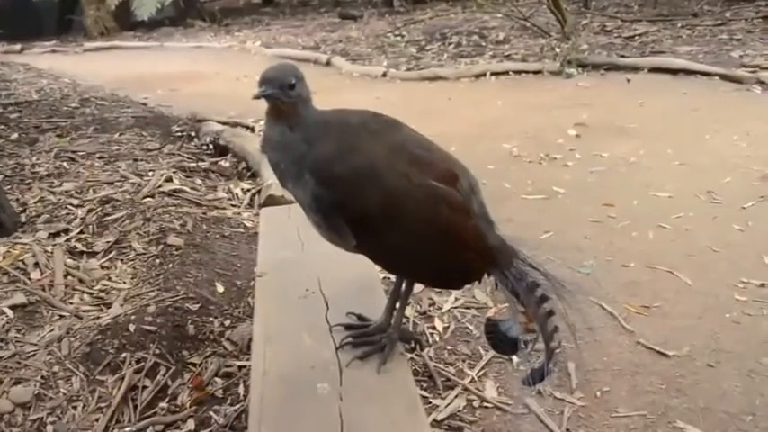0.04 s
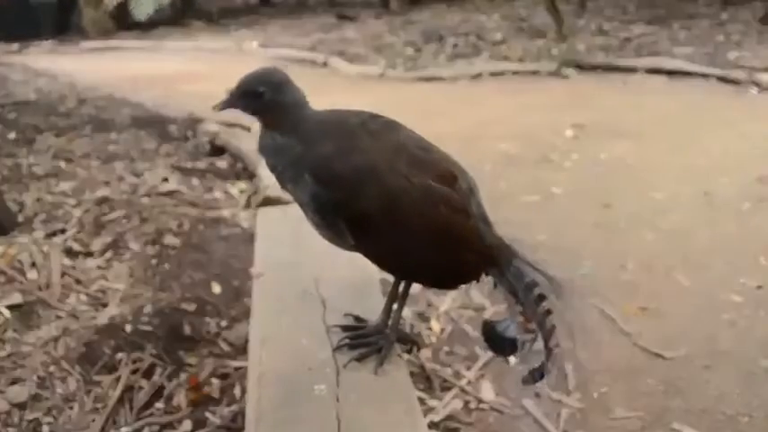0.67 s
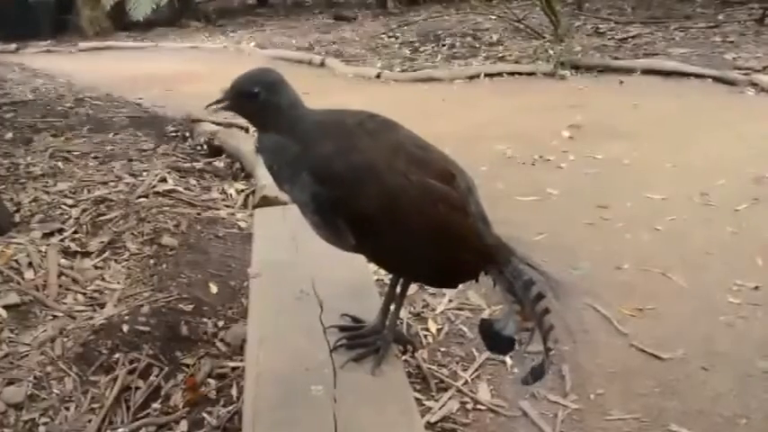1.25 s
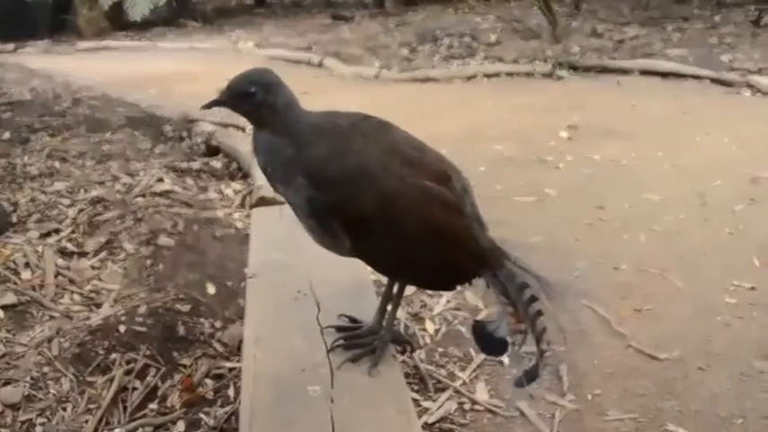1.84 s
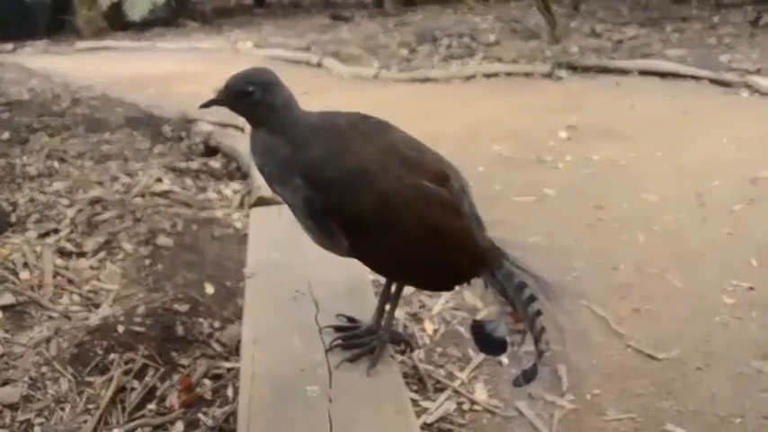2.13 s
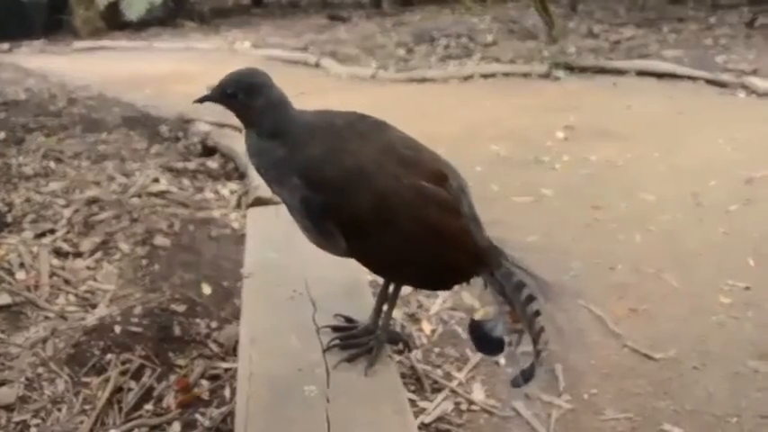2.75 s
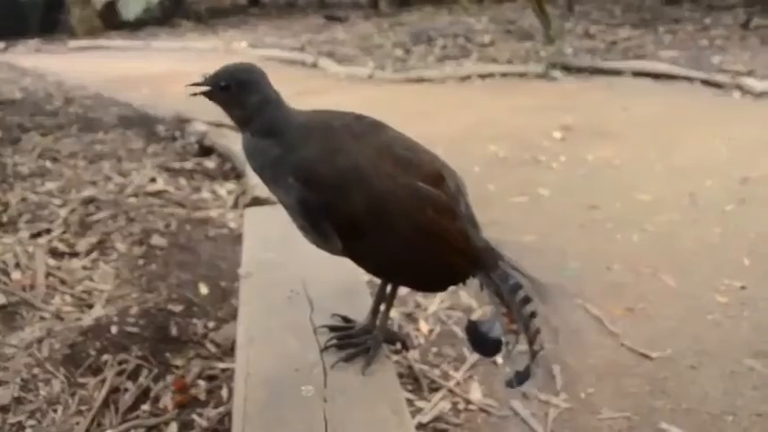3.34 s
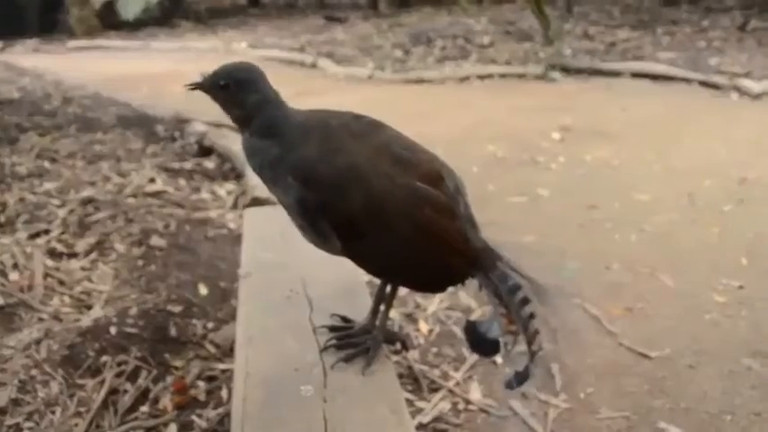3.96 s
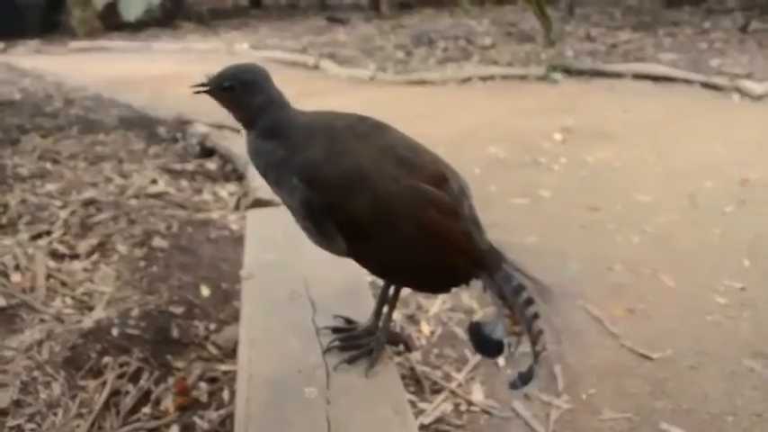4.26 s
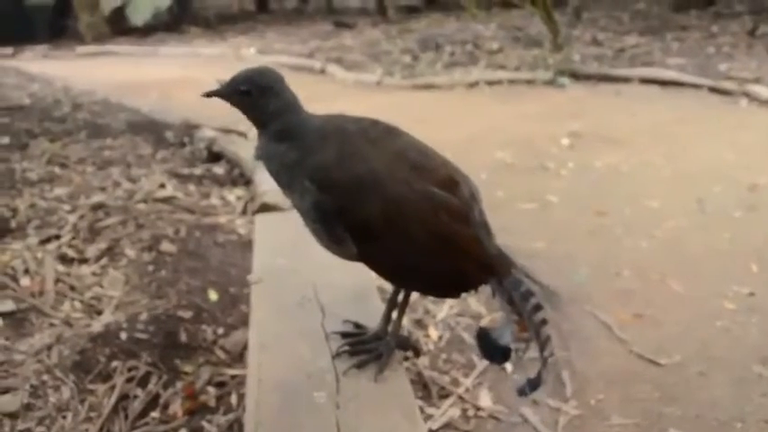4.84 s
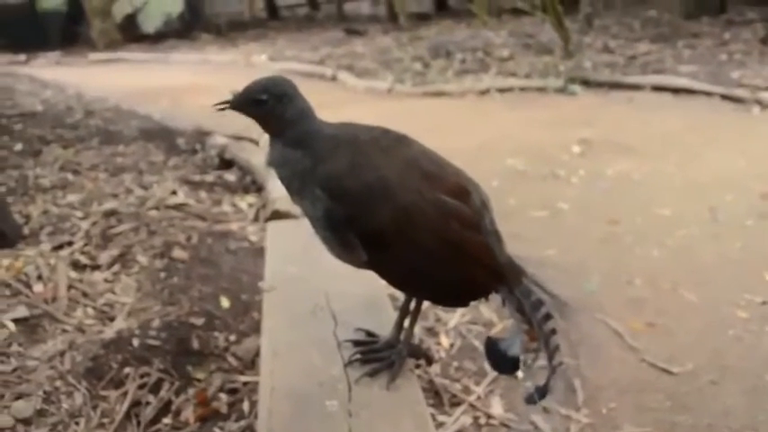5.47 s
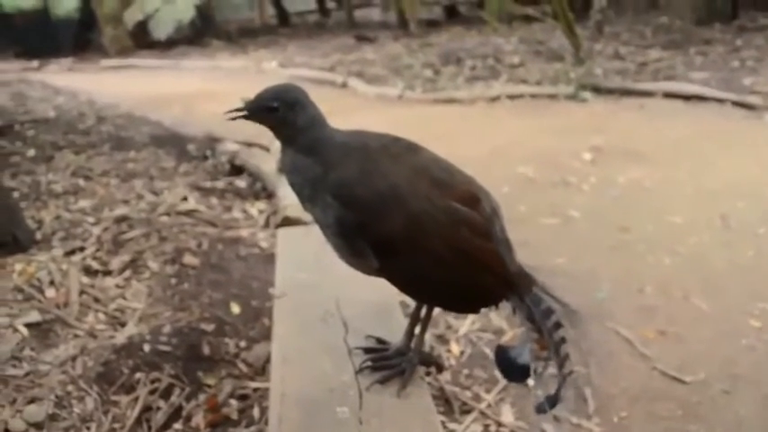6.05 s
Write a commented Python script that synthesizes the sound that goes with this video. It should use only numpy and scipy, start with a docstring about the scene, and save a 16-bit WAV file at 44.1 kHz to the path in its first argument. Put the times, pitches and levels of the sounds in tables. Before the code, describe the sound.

A lyrebird about a metre from the microphone makes sharp, shutter-like clicks and short rasps, then a loud falling whistle and a rising one. More clicks lead into four short, hoarse wails, followed by clicks mixed with rough growls, a quick hoot and a yelp. Other birds call far off over the soft hush of a wooded enclosure with a faint echo.

```python
"""A lyrebird's imitations

A lyrebird on the ground of a wooded enclosure, about a metre away, gives shutter-like clicks and rasps,
a falling and a rising whistle, four hoarse wails, then growls, a hoot and a yelp. Its syrinx is the
source, of tones or of pulses; throat, chest and beak are the resonators that filter it.
Other birds call far off over a soft outdoor hush, and the surroundings give a faint echo."""
import sys
import numpy as np
from scipy import signal
from scipy.fft import rfft, irfft
from scipy.io import wavfile
from scipy.ndimage import uniform_filter1d

SR = 44100
rng = np.random.default_rng(int(sys.argv[2]) if len(sys.argv) > 2 else 0)


def store_pcm(level_fs):
    """Save levels as 16-bit WAV."""
    pcm = np.round(np.clip(level_fs, -1, 1) * 32767).astype(np.int16)
    wavfile.write(sys.argv[1], SR, np.atleast_2d(pcm).T)


N = 268921
BAND_LIMIT_HZ = 15750


def amp(db):
    """Amplitude ratio of a level in decibels."""
    return 10 ** (np.asarray(db) / 20)


def unit_rms(x):
    """Normalisation to rms 1."""
    return x / np.sqrt(np.mean(x ** 2) + 1e-20)


def steadied(x):
    """Division by the running rms flattens the envelope and keeps the grain."""
    return x / np.sqrt(abs(uniform_filter1d(x ** 2, 500)) + 1e-12)


def level_at(spectrum, hz):
    """Level of a spectrum, interpolated over log frequency."""
    f, db = np.transpose(spectrum)
    return np.interp(np.log(hz + 1), np.log(f + 1), db)


def contours(rows):
    """Sample times of a call, then each column interpolated linearly."""
    times, *columns = np.transpose(rows)
    t = np.arange(times[0], times[-1], 1 / SR)
    return [t] + [np.interp(t, times, column) for column in columns]


def progress(length):
    """Normalised time, 0 to 1 over a note."""
    return np.linspace(0, 1, int(length * SR))


def phase_of(hz):
    """Phase is the time integral of frequency."""
    return 2 * np.pi * np.cumsum(hz) / SR


def add(mix, start, sound):
    """Superposition of a sound on the mix from its start time."""
    part = mix[max(round(start * SR), 0):][:len(sound)]
    part += sound[:len(part)]


def faded(x):
    """A cosine taper softens both ends of a call."""
    return x * signal.windows.tukey(len(x), min(1, 200 / len(x)))


def gate(size, edge_s):
    """Trapezoidal envelope: attack, hold and release."""
    t = np.arange(size) / SR
    return np.minimum(np.minimum(t, t[::-1]) / edge_s, 1)


def wander(size, hz):
    """Random modulation: noise of rms about 1, low-passed near hz."""
    f = np.fft.rfftfreq(size + 4096, 1 / SR)
    spectrum = rfft(rng.standard_normal(2 * len(f) - 2))
    return unit_rms(irfft(spectrum * np.exp(-(f / hz) ** 2)))[:size]


def colour(x, spectrum, tilt_db=0):
    """Minimum-phase filter with the given spectrum, tilted by tilt_db an octave."""
    hz = np.fft.rfftfreq(2048, 1 / SR)
    octaves = np.log2(np.clip(hz, 500, 7000) / 2000)
    log_gain = np.log(amp(level_at(spectrum, hz) + tilt_db * octaves))
    log_response = signal.hilbert(np.r_[log_gain, log_gain[-2:0:-1]]).conj()
    taps = np.fft.ifft(np.exp(log_response)).real
    return signal.fftconvolve(x, taps[:len(hz)])[:len(x)]


def cut(x, order, hz, kind):
    """Maximally flat low-pass or high-pass filter."""
    return signal.sosfilt(signal.butter(order, hz, kind, fs=SR, output="sos"), x)


def resonate(x, hz, *widths_hz):
    """Resonators in cascade, one per bandwidth, with unit gain at a centre hz that may slide."""
    carrier = np.exp(1j * phase_of(hz * np.ones(len(x))))
    for width in widths_hz:
        pole = np.exp(-np.pi * width / SR)
        x = 2 * (carrier * signal.lfilter([1 - pole], [1, -pole], x / carrier)).real
    return x


def pulses(size, rate_hz, jitter, air):
    """Pulse-train source: uneven slaps of the syrinx membranes, with some rushing air."""
    cycles = np.cumsum(rate_hz * np.exp(jitter * wander(size, rate_hz))) / SR
    slaps = np.diff(np.floor(cycles), prepend=0) * np.exp(jitter * rng.standard_normal(size) / 2)
    return unit_rms(slaps - slaps.mean()) + air * rng.standard_normal(size)


def dip_gain(hz):
    """Frequency-dependent gain: a gliding tone dips briefly as it passes certain pitches."""
    # f/Hz, width/Hz, depth/dB
    dips = [(1600, 75, 13), (2550, 30, 17), (2940, 65, 8), (3405, 84, 12), (4360, 84, 15)]
    return amp(-sum(depth / (1 + ((hz - centre) / width) ** 2) ** 2 for centre, width, depth in dips))


def hush(air_db=-48.5, swell_db=1.5):
    """Filtered noise: steady outdoor air, and a soft rustle that comes and goes."""
    # spectra of the air and the rustle: f/Hz, relative level/dB
    air_spectrum = [(15, -55), (25, -11.5), (113, 0), (482, -6), (782, -2), (997, -5.5), (1300, -3),
                    (1710, -4.5), (2120, -1), (4380, -10.5), (5730, -13.5), (6210, -15), (8810, -8.5),
                    (10900, -14.5), (15500, -58)]
    rustle_spectrum = [(300, -5.5), (800, 3), (2200, -6), (4500, -7.5), (7000, -12), (12000, -25),
                       (15000, -64)]
    # envelope of the rustle: t/s, level/dB
    rustle_levels = [(0, -76), (.3, -50), (.5, -47.5), (.9, -46.5), (1.5, -46), (1.9, -52.5), (2.2, -73),
                     (4.4, -50.5), (5.4, -57), (5.62, -47), (6.1, -65)]
    rustle_db = np.interp(np.arange(N) / SR, *np.transpose(rustle_levels))
    air_gain = amp(air_db + swell_db * wander(N, 2.9))
    air = unit_rms(colour(rng.standard_normal(N), air_spectrum))
    rustle = unit_rms(colour(rng.standard_normal(N), rustle_spectrum))
    return air_gain * air + amp(rustle_db) * rustle


def far_ring(hz=840, width_hz=110, db=-57, swell_db=3):
    """Narrow-band noise is heard as a faint ring in the distance."""
    ring = resonate(rng.standard_normal(N), hz, width_hz, width_hz)
    return amp(db + swell_db * wander(N, 3)) * unit_rms(ring)


def far_cries(mix, waver=0.008, fading=0.3):
    """Fading: a far bird's three harmonics swell and sink on their way through the trees."""
    # t/s, length/s, start f/Hz, end f/Hz, level/dB of harmonics 1, 2 and 3
    calls = [(0, 0.29, 630, 702, -73, -57.5, -54.5), (.26, 0.32, 801, 817.4, -58, -53.5, -50),
             (.56, 0.18, 692, 668, -47, -61, -58), (2.05, 0.34, 802, 841, -52.5, -77, -86),
             (2.85, 0.12, 829, 820, -46, -75, -55.5), (4.44, 0.21, 794, 816.5, -50.5, -57, -38),
             (4.66, 0.3, 785, 783, -59, -61, -42), (4.95, 0.21, 764, 776, -51, -69, -54)]
    for start, length, start_hz, end_hz, *levels in calls:
        size = int(length * SR)
        phase = phase_of(np.linspace(start_hz, end_hz, size) * (1 + waver * wander(size, 120)))
        tone = sum(np.sqrt(2) * amp(db) * (1 + fading * wander(size, 52)) * np.sin(k * phase)
                   for k, db in enumerate(levels, 1))
        add(mix, start, tone * signal.windows.tukey(size, 0.4))


def clicks(mix, echo_s=0.0008, flutter_s=0.0046, hard_until_s=0.79, saturation=1.06, size=1500):
    """Impulse excitation: a sharp snap and its instant echo knock hollowly, then a flutter dies."""
    # t/s, peak level before rounding/dB, tilt/(dB per octave)
    snaps = [(.336, -19.5, 8), (.672, -17, -4), (.713, -15, -2), (.72, -4, -1), (0.7625, -19, -1),
             (0.769, -5, -2), (.798, -13.5, 1), (.897, -21.5, 8), (1.409, -18, 13), (1.8841, -15, 4.5),
             (2.3372, -13, -4), (2.3429, -11, -4), (2.3808, -14, 2), (2.388, -6.5, -2.5), (2.4174, -18, -2),
             (4.06, -18, 3.5), (4.7416, -8, -1), (4.753, -14.5, 4), (4.8162, -3.5, 0), (4.834, -13, 4.5),
             (4.8837, -2, 1.5), (4.9052, -18, 8), (5.6714, -7.5, -1.5), (5.6855, -4, 0.5), (5.726, -15, -1),
             (5.7412, -12, -4.5), (5.997, -13, -4), (6.0054, -16, -3), (6.0854, -6.5, 0.5),
             (6.096, -16, -.5)]
    # spectrum of a snap: f/Hz, gain/dB
    spectrum = [(100, -30), (300, -11.5), (700, -2.5), (1250, -5), (1800, -2.5), (2500, -3), (4000, -4.5),
                (5100, -10.5), (5700, -8.5), (6300, -14.5), (9000, -19), (11000, -28), (15000, -93)]
    t = np.arange(size) / SR
    for start, db, tilt_db in snaps:
        flutter = pulses(size, rate_hz=1000, jitter=0.25, air=0.45)
        drive = 0.091 * flutter * np.exp(-t / flutter_s) * (t > 2 * echo_s)
        drive[0] += 1
        drive[round(echo_s * SR)] += 0.41  # reflection off the ground
        hardness = 2.2 if start < hard_until_s else 1
        knock = 0.94 * hardness * resonate(drive, 1200, 380)
        snap = colour(drive + knock, spectrum, tilt_db)
        rounded = np.tanh(saturation * snap / abs(snap).max()) / saturation
        add(mix, start, amp(db) * cut(rounded, 6, 10500, "low"))


def rasps(mix, split_hz=5700, body_sag_db=22.5, treble_sag_db=24):
    """Source and filter: fast, uneven pulses pass the wide open beak over a falling low resonance."""
    # t/s, length/s, body level/dB, treble level/dB, tilt/(dB per octave)
    bursts = [(.806, 0.053, -13, -18.5, 0), (.985, 0.055, -12.5, -16.5, 2), (2.428, 0.054, -11.5, -17, 1.5),
              (2.613, 0.057, -16, -22.5, 2.5), (5.504, .067, -17, -23, -5.5)]
    # response through the open beak: f/Hz, gain/dB
    spectrum = [(200, -52), (500, -23.5), (800, -8.5), (1150, -25.5), (1650, -9.5), (2500, -2.5),
                (3300, -6.5), (4000, 0), (5100, 0), (5700, -11.5), (6400, 9.5), (7500, -5), (9000, -10.5),
                (10500, -23.5), (15000, -61)]
    for start, length, db, treble_db, tilt_db in bursts:
        u = progress(length)
        drive = pulses(len(u), rate_hz=980, jitter=0.25, air=0.58)
        voice = colour(drive, spectrum, tilt_db)
        falling = steadied(resonate(drive, np.linspace(1600, 850, len(u)), 220, 220))
        body = steadied(cut(voice, 6, split_hz, "low")) + amp(-12) * falling
        treble = steadied(cut(voice, 6, split_hz, "high"))
        # the treble peaks sooner and falls further
        body *= amp(db - body_sag_db * (2 * (u - 0.5)) ** 2)
        treble *= amp(treble_db - treble_sag_db * (2 * (u - 0.45)) ** 2)
        add(mix, start, gate(len(u), edge_s=0.0038) * (body + treble))


def whistles(mix, waver=0.0063, rolloff_db=-1.0, flicker_db=4):
    """Frequency modulation: nearly pure sweeps with faint, flickering overtones."""
    # one curve a sweep: t/s, f/Hz, level/dB
    sweeps = [
        [(1.165, 7000, -46), (1.192, 5050, -39.5), (1.212, 4347, -20.5), (1.275, 3850, -11.5),
         (1.315, 3077, -4.5), (1.345, 2300, -11), (1.365, 1648, -15.5), (1.39, 1328, -17), (1.41, 955, -36)],
        [(1.598, 700, -39.5), (1.628, 1077, -25), (1.678, 1320, -15.5), (1.697, 1640, -17), (1.716, 2380, -9),
         (1.733, 2800, -10), (1.753, 3170, -16), (1.811, 3830, -15.5), (1.838, 5160, -51)],
        [(5.912, 1293, -43), (5.935, 1242, -38), (5.955, 1122, -27), (5.972, 910, -29.5), (5.988, 850, -27),
         (5.996, 820, -40)],
    ]
    # spectral envelope of the overtones before roll-off: f/Hz, relative level/dB
    spectrum = [(1900, -13), (2500, -20), (3500, -41), (5000, -32), (6000, -40.5), (7300, -24.5),
                (9000, -33.5), (11000, -46.5), (15000, -61)]
    # one value a sweep: overtone gain/dB
    brightness = [0.5, 1, -3]
    for rows, brightness_db in zip(sweeps, brightness):
        t, hz, db = contours(rows)
        phase = phase_of(hz * (1 + waver * wander(len(t), 270)))
        tone = dip_gain(hz) * np.sin(phase)
        for k in range(2, 11):
            overtone_db = level_at(spectrum, k * hz) + rolloff_db * k + flicker_db * wander(len(t), 71)
            tone += amp(overtone_db + brightness_db) * (k * hz < BAND_LIMIT_HZ) * np.sin(k * phase)
        add(mix, t[0], faded(np.sqrt(2) * amp(db) * tone))


def glide(length, start_hz, end_hz, db, waver, rough):
    """A short exponential sweep, randomly modulated in frequency and amplitude."""
    size = int(length * SR)
    hz = np.geomspace(start_hz, end_hz, size) * (1 + waver * wander(size, 360))
    tone = np.sin(phase_of(hz)) * (1 + rough * wander(size, 430))
    tone *= signal.windows.tukey(size, 0.7)
    return amp(db) * unit_rms(cut(tone, 4, 420, "high"))


def chirps(mix, fall_octaves_per_s=7.5):
    """Downward frequency sweeps of a small bird further off."""
    # t/s, length/s, start f/Hz, level/dB
    notes = [(2.668, 0.043, 4075, -40), (3.122, 0.055, 4160, -38.5), (3.238, 0.065, 4360, -43),
             (3.272, 0.022, 4250, -39.5), (3.28, 0.041, 3340, -40), (3.484, .027, 3150, -39),
             (3.565, 0.035, 3754, -38.5), (3.588, 0.048, 3430, -36.5), (3.711, 0.045, 3364, -40),
             (3.759, 0.019, 3260, -39), (3.777, 0.022, 2890, -38), (4.029, .035, 3810, -37.5)]
    for start, length, hz, db in notes:
        end_hz = hz * 2 ** (-fall_octaves_per_s * length)
        add(mix, start, glide(length, hz, end_hz, db, waver=0.019, rough=0.4))


def cry(start, hz, main_gain, fundamental_gain, upper_gain, rough, buzz,
        beat_hz=172, beat_from_s=4.245, beat_to_s=4.395, bounce_s=0.000803):
    """Formant tuning: a harmonic voice whose second harmonic is picked out by the throat."""
    # response of the throat: f/Hz, gain/dB
    throat = [(2000, 16), (2700, 9), (3400, 5.5), (4200, -0.5), (4900, 6), (5700, -16), (6400, -2.5),
              (7300, -3), (8000, -5), (9000, -12), (11000, -22.5), (15000, -40)]
    size = len(hz)
    t = start + np.arange(size) / SR
    phase = phase_of(hz * (1 + 0.05 * rough * wander(size, 450)))
    main = np.sin(2 * phase) * (1 + 0.11 * rough * wander(size, 233))
    # the other side of the syrinx sings close to the last wail and beats with it
    beat_progress = np.clip((t - beat_from_s) / (beat_to_s - beat_from_s), 0, 1)
    other_gain = amp(-7.5) * np.sqrt(np.maximum(np.sin(np.pi * beat_progress), 0))
    other_side = np.sin(2 * phase - 2 * np.pi * beat_hz * (t - start))
    main = (main + other_gain * other_side) / np.sqrt(1 + other_gain ** 2)
    # period doubling: strong and weak cycles in turn put lines halfway between the harmonics
    doubling = buzz * np.cos(phase / 2)
    main *= 1 + 4 * amp(-12) * doubling
    overtones = np.zeros(size)
    for k in range(3, 20):
        flicker_db = 4 * wander(size, 39)
        db = level_at(throat, k * hz) - 3 * (k % 2) + 0.53 * k + flicker_db
        overtones += amp(db) * np.sin(k * phase + rng.uniform(0, 2 * np.pi))
    puffs = rng.standard_normal(size) * (1 + np.cos(phase))
    breath = unit_rms(colour(puffs, [(300, -26), (900, -10)] + list(throat)))
    upper = unit_rms(overtones) * (1 + 2 * doubling) + (0.28 + 0.59 * rough) * breath
    # the reflection off the ground comb-filters the overtones
    upper = steadied(upper + 0.21 * np.interp(t - bounce_s, t, upper))
    lower = np.sqrt(2) * (main_gain * main + fundamental_gain * np.sin(phase))
    return faded(lower + upper_gain * amp(-3) * upper)


def yips(mix):
    """Voice breaks: hoarse scraps of the cry swell and die on the way into and out of a wail."""
    # t/s, length/s, start f/Hz, end f/Hz, second-harmonic level/dB, overtone gain/dB
    notes = [(2.94, 0.025, 681, 612, -14.5, -29), (2.962, 0.027, 683, 642, -9.5, -23.5),
             (2.988, 0.019, 688, 770, -10.5, -26), (3.001, 0.018, 798, 777, -20.5, -25),
             (3.205, 0.021, 820, 692, -17, -39.5), (3.328, 0.038, 632, 569, -18, -33.5),
             (3.363, 0.022, 715, 673, -12, -28), (3.384, 0.032, 893, 855, -26.5, -34),
             (3.416, 0.028, 970, 940, -22.5, -37.5), (3.628, 0.039, 787, 740, -21, -42.5),
             (3.811, 0.023, 898, 928, -33.5, -41), (3.833, 0.022, 1030, 848, -21, -29.5),
             (3.853, .042, 779, 650, -15, -28)]
    for start, length, start_hz, end_hz, db, upper_db in notes:
        u = progress(length)
        arch = abs(np.sin(np.pi * u))
        hz = start_hz + (end_hz - start_hz) * u
        yip = cry(start, hz, amp(db) * arch ** 0.96, amp(-34) * arch, amp(upper_db) * arch ** 0.24,
                  rough=0.58, buzz=0.051)
        add(mix, start, yip)


def wails(mix, clearing=0.49, buzz_from=0.65, buzz_rise=0.098, beak_hz=7280, beak_width_hz=560):
    """Held cries start hoarse, clear, and end in period doubling; the open beak resonates shrilly."""
    # one curve a wail: t/s, fundamental f/Hz, second-harmonic level/dB, overtone gain/dB
    curves = [
        [(3.014, 855, -27, -22), (3.035, 896, -19, -35.5), (3.098, 870, -9.5, -36), (3.14, 831, -16, -32),
         (3.209, 777, -16.5, -36.5)],
        [(3.443, 941, -20, -37), (3.482, 889, -18, -34.5), (3.538, 862, -21.5, -37.5), (3.6, 809, -22.5, -38.5),
         (3.636, 777, -21.5, -36)],
        [(3.89, 589.5, -22, -36), (3.935, 661, -21.5, -31), (3.98, 647, -10, -33.5), (4.004, 643, -9, -28.5),
         (4.04, 698, -20.5, -32.5), (4.065, 740, -21, -47)],
        [(4.243, 589, -21.5, -41), (4.283, 579, -21.5, -28), (4.306, 700, -15, -28), (4.333, 930, -15.5, -25.5),
         (4.361, 725, -24.5, -30), (4.395, 834, -15.5, -26.5), (4.425, 856, -16, -30),
         (4.46, 839, -26.5, -24.5), (4.495, 810, -37, -50)],
    ]
    # one row a wail: fundamental level/dB, roughness (0-1), buzz (0-1), beak gain/dB
    timbres = [(-31.5, 0.14, 0.06, -20), (-33, 0.26, 0.06, -2), (-40, 0.15, 0.03, 3),
               (-34.5, 0.42, 0.31, -14)]
    for rows, (fundamental_db, rough, buzz, beak_db) in zip(curves, timbres):
        t, hz, db, upper_db = contours(rows)
        u = np.linspace(0, 1, len(t))
        hoarseness = rough * (1 + clearing * (1 - 2 * u))
        buzzing = buzz * np.clip((u - buzz_from) / buzz_rise, 0, 1)
        voice = cry(t[0], hz, amp(db), amp(fundamental_db), amp(upper_db), hoarseness, buzzing)
        voice *= gate(len(t), edge_s=0.0074)
        beak = resonate(voice, beak_hz, beak_width_hz, beak_width_hz)
        add(mix, t[0], voice + amp(beak_db) * beak)


def grunts(mix):
    """Deep random modulation roughens soft, low notes between the clicks."""
    # t/s, length/s, start f/Hz, end f/Hz, level/dB
    notes = [(4.779, 0.035, 535, 590, -39.5), (4.844, 0.033, 724, 527, -35)]
    for start, *note in notes:
        add(mix, start, glide(*note, waver=0.066, rough=0.74))


def growl(rows, rate_hz, jitter, air, width_hz, edge_db, throb, rumble_db, throb_hz=130):
    """Forced resonance: bunched pulses ring the chest and a throat formant moved by the closing beak."""
    # responses of the chest, the hard edge and the throat: f/Hz, gain/dB
    chest_spectrum = [(150, -19), (350, -14), (600, -6), (1000, 13.5), (1350, 9), (1900, 5.5), (4000, -52),
                      (12000, -91)]
    edge_spectrum = [(1200, -15), (4000, -7), (5000, -1.5), (6300, -2.5), (7500, -6), (9000, -6),
                     (11000, -18), (15000, -51)]
    throat_spectrum = [(3500, 11), (5000, 14.5), (7000, -30), (12000, -59)]
    t, hz, throat_db, chest_db = contours(rows)
    drive = pulses(len(t), rate_hz, jitter, air)
    formant = steadied(resonate(drive, hz, width_hz, width_hz, width_hz))
    throat = steadied(colour(formant, throat_spectrum))
    edge = steadied(colour(drive, edge_spectrum)) * (hz / 3200) ** 3  # dies as the beak closes
    rumble_hz = np.geomspace(430, 1050, len(t))  # climbs as the throat tightens
    rumble = steadied(resonate(drive, rumble_hz, 300, 350))
    chest = steadied(steadied(colour(drive, chest_spectrum)) + amp(rumble_db) * rumble)
    bunches = 1 + throb * np.sin(phase_of(throb_hz * (1 + 0.22 * wander(len(t), 51))))
    return faded(bunches * (amp(throat_db) * (throat + amp(edge_db) * edge) + amp(chest_db) * chest))


def growls(mix):
    """Aperiodic pulses and a broad formant make two rough growls."""
    # one curve a growl: t/s, formant f/Hz, throat level/dB, chest level/dB
    curves = [
        [(5.05, 2480, -47, -44), (5.07, 3020, -36, -29.5), (5.085, 3450, -25.5, -33.5),
         (5.097, 2740, -28, -22.5), (5.108, 2050, -17.5, -25), (5.122, 1700, -31, -49)],
        [(5.268, 2320, -46, -42.5), (5.305, 2750, -24, -28.5), (5.335, 3120, -26.5, -30.5),
         (5.372, 2140, -26.5, -35), (5.378, 1950, -16.5, -38), (5.407, 1660, -25, -29), (5.417, 1500, -55, -50)],
    ]
    for rows in curves:
        add(mix, rows[0][0], growl(rows, rate_hz=510, jitter=0.39, air=0.38, width_hz=1120,
                                   edge_db=-13.5, throb=0.21, rumble_db=-3.5))


def hoot(mix):
    """The harmonic cry in one quick arch of pitch, its envelope peaking late."""
    # t/s, length/s, f/Hz at the ends and at the top, gain/dB of harmonic 2, fundamental and overtones
    note = (5.128, 0.0432, 608, 856.5, -9.5, -50, -30)
    start, length, end_hz, top_hz, db, fundamental_db, upper_db = note
    u = progress(length)
    arch = abs(np.sin(np.pi * u))
    hz = end_hz + (top_hz - end_hz) * arch
    swell = abs(np.sin(np.pi * u ** 1.6)) ** 0.62
    main_gain = amp(db) * swell * dip_gain(2 * hz)
    upper_gain = amp(upper_db) * np.sqrt(arch)
    add(mix, start, cry(start, hz, main_gain, amp(fundamental_db), upper_gain, rough=0.16, buzz=0))


def yelp(mix):
    """Nearly periodic pulses and a narrower formant make a short, clearer growl."""
    # t/s, formant f/Hz, throat level/dB, chest level/dB
    rows = [(5.812, 3080, -47, -61), (5.817, 2700, -36, -27.5), (5.826, 2570, -19, -24.5),
            (5.833, 2120, -24.5, -24), (5.846, 1900, -21.5, -25.5), (5.85, 1350, -27, -27),
            (5.859, 1260, -32, -35), (5.871, 1300, -63, -48)]
    add(mix, rows[0][0], growl(rows, rate_hz=660, jitter=0.054, air=0.087, width_hz=510,
                               edge_db=-11, throb=0.054, rumble_db=-31))


def echo(x, early_db=-24, early_t60=0.31, late_db=-29, late_t60=0.49):
    """Reverberation: near ground and trunks scatter quickly, the far enclosure weakly and for longer."""
    # spectrum of the reflections: f/Hz, relative level/dB
    spectrum = [(200, -13.5), (800, -2), (1800, 0), (3000, -1.5), (4500, -1), (7000, 6.5), (12000, -15.5)]
    t = np.arange(SR) / SR
    reflections = rng.standard_normal((2, SR)) * (rng.random((2, SR)) < 0.06) * (t > 0.004)
    response = np.zeros(SR)
    for taps, db, t60 in zip(reflections, (early_db, late_db), (early_t60, late_t60)):
        tail = colour(taps * amp(-60 * t / t60), spectrum)
        response += amp(db) * tail / np.linalg.norm(tail)
    return signal.fftconvolve(x, response)[:N]


def scene():
    """Superposition of the near lyrebird, the more reverberant far birds and the air around them."""
    near, far = np.zeros((2, N))
    for source in (whistles, wails, yips, hoot, rasps, growls, yelp, clicks, grunts):
        source(near)
    chirps(far)
    far_cries(far)
    return (near + far + echo(near + amp(19.5) * far) + hush() + far_ring())[None]


def record(dry):
    """Filtering: the microphone port cuts two narrow notches, and a low-pass limits the band."""
    # f/Hz, width/Hz
    notches = [(5720, 280), (6900, 190)]
    for hz, width in notches:
        dry = signal.lfilter(*signal.iirnotch(hz, hz / width, fs=SR), dry)
    low_pass = signal.firwin(511, BAND_LIMIT_HZ, window=("kaiser", 9), fs=SR)
    return signal.oaconvolve(dry, low_pass[None], "same")


dry = scene()
out = record(dry)
store_pcm(out)
```